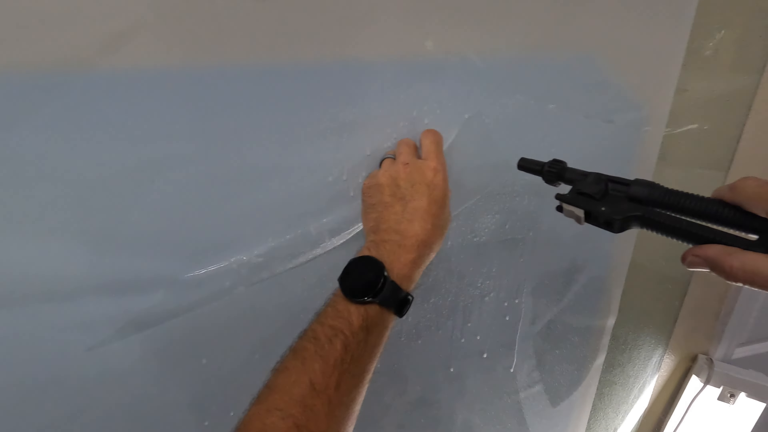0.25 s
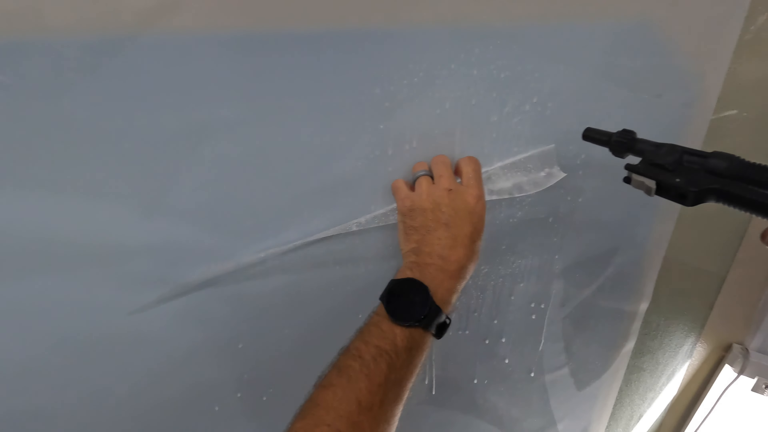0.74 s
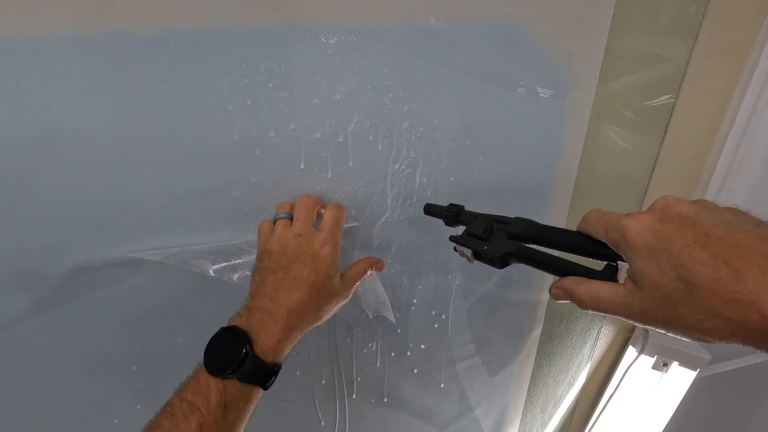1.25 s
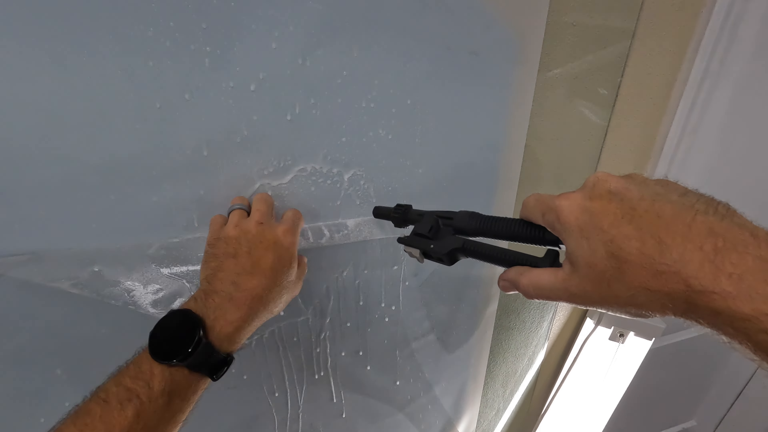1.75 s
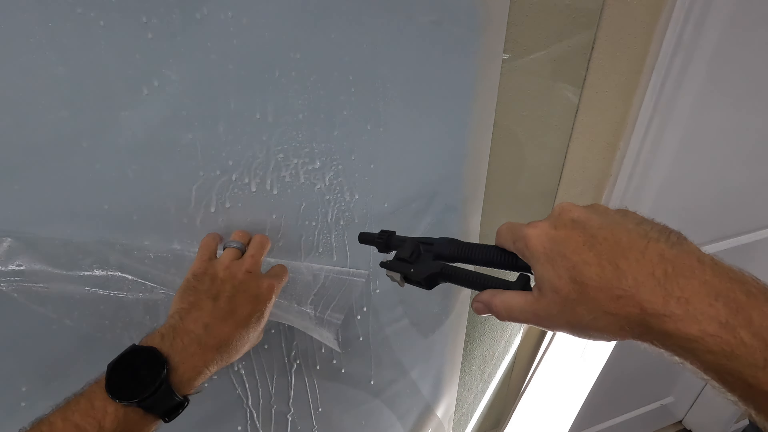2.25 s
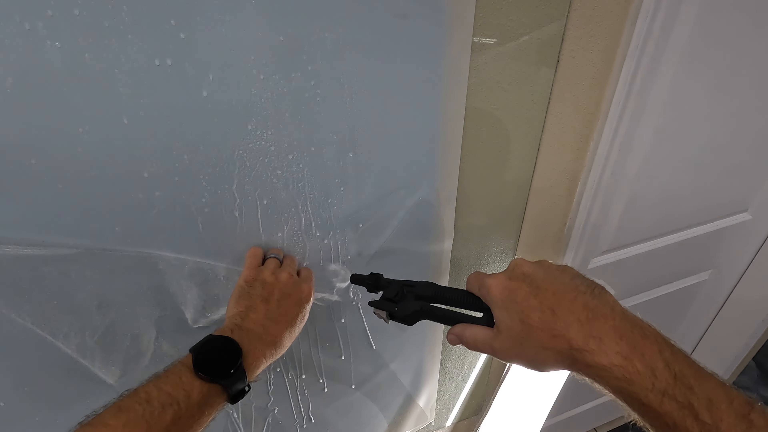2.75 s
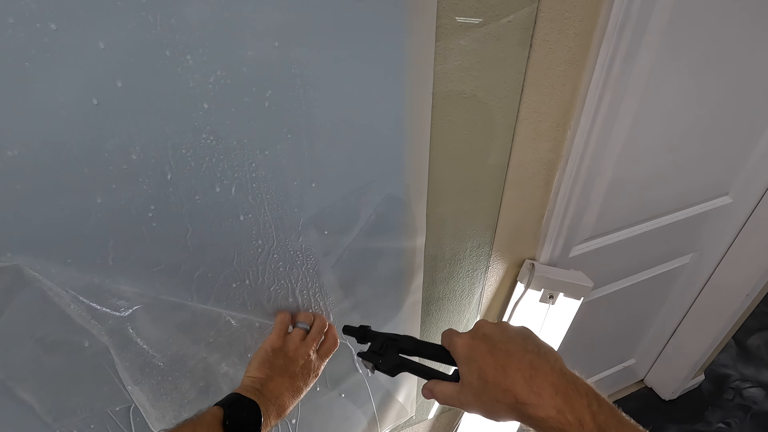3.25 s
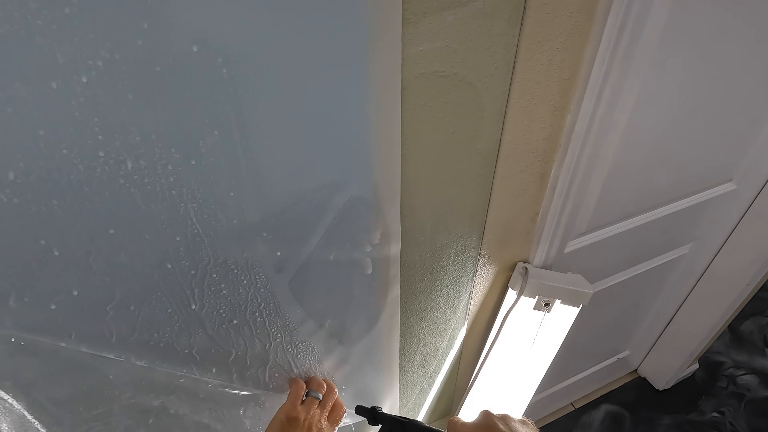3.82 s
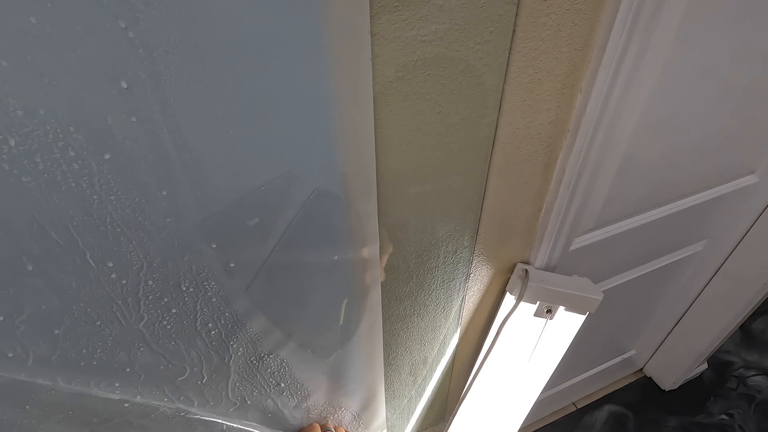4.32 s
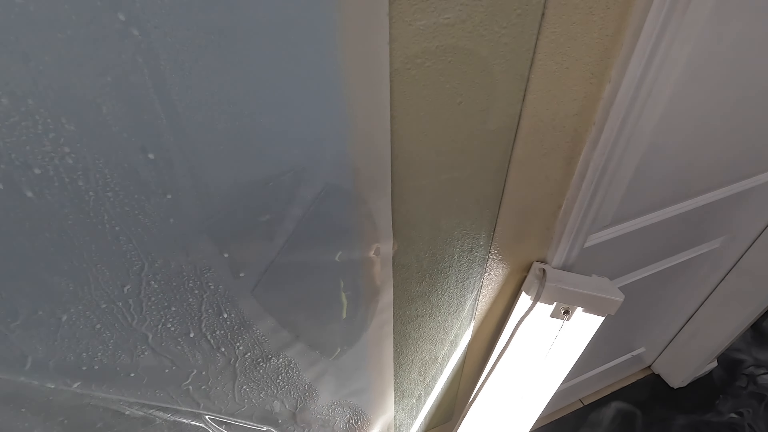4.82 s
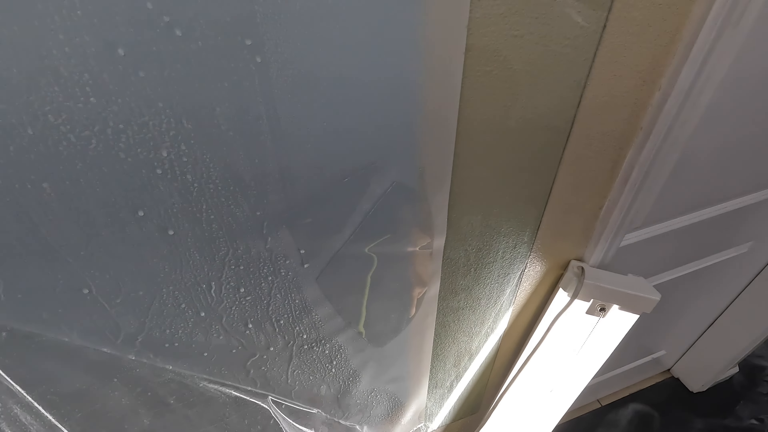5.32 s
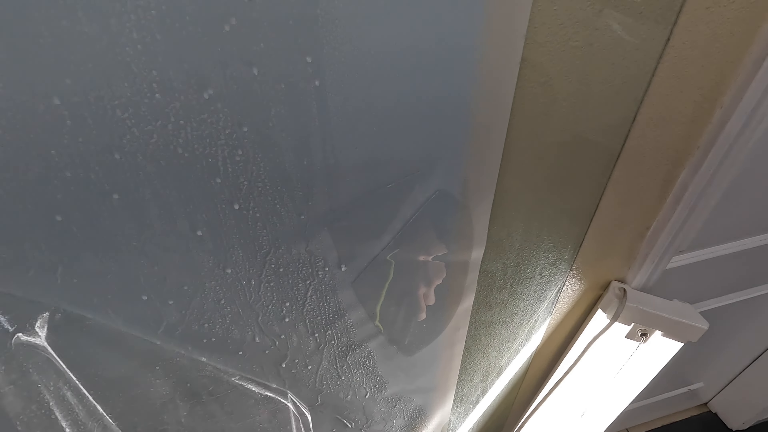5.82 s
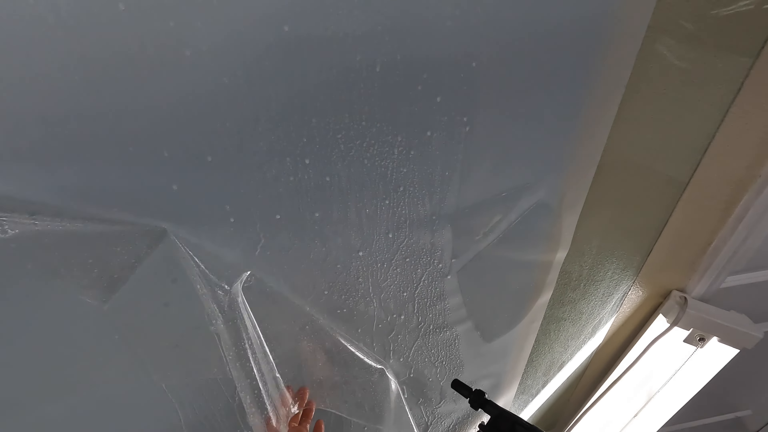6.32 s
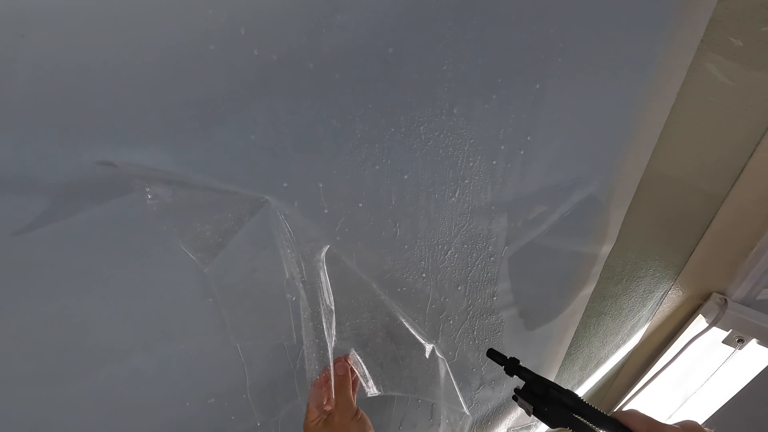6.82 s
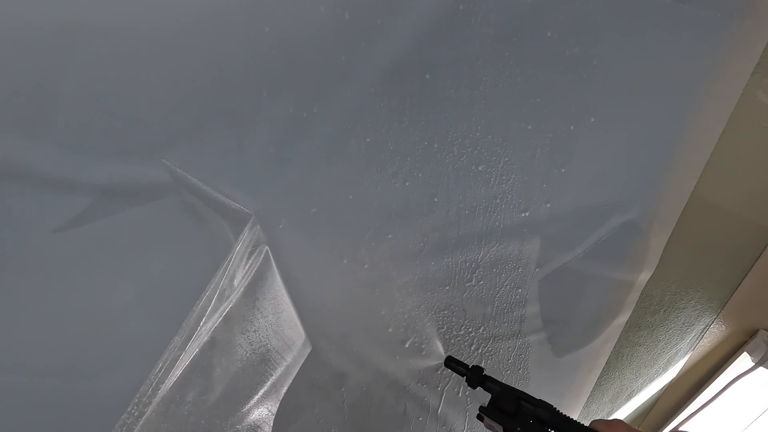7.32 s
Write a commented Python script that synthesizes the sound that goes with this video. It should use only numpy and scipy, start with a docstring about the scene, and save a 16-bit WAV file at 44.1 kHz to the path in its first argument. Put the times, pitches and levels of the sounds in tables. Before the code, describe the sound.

Short wet hisses from a trigger sprayer under thin plastic film, with crinkles, sharp film snaps, a longer final spray and low ventilation rumble.

```python
"""Ventilation rumbles throughout: a resonant deep hum of noise and banded noise for the rush of air. A trigger
sprayer is already squirting under a clear plastic film on a large pane: gated clouds of clicks. From 0.2 s on,
between and over squirts, the film rustles (clumped clicks) and snaps (ringing pops, cracks); brief dull low
knocks sound (decaying sines). Fine foam ticks gather around 5 s, then wet film swishes off the glass into the
last, longest squirt at 7 s. A hard-walled workshop rings on: decaying noise, band by band."""
import sys
import numpy as np
from scipy import signal
from scipy.io import wavfile

SR = 44100
rng = np.random.default_rng(int(sys.argv[2]) if len(sys.argv) > 2 else 0)


def put_to_file(sound):
    """Save the sound as 16-bit audio at rate SR, in the file named by the first command-line argument."""
    columns = np.atleast_2d(sound).T  # one column per channel
    safe = np.clip(columns, -1, 1)
    whole_steps = np.round(safe * 32767)
    wavfile.write(sys.argv[1], SR, whole_steps.astype(np.int16))


N = 333396
TIME = np.arange(N) / SR


def from_db(db):
    """Gain of a level in dB."""
    return 10 ** (np.asarray(db) / 20)


def rms_one(x):
    """Scale to rms 1."""
    return x / np.sqrt(np.mean(x ** 2) + 1e-20)


def in_time(rows):
    """Draw breakpoint columns as curves, one value per sample; the first column is t/s."""
    s, *columns = np.transpose(rows)
    return np.array([np.interp(TIME, s, column) for column in columns])


def at_hz(points, hz):
    """Read a (f/Hz, value) curve on a log frequency axis."""
    f, values = np.array(points).T
    return np.interp(np.log(hz), np.log(f), values)


def drift(rate):
    """Random wander: 'rate' noise knots a second, of spread 1, joined by lines."""
    knots = rng.standard_normal(int(N / SR * 400))
    return np.interp(TIME * rate, np.arange(len(knots)), knots)


def bands(white, low_hz, per_octave):
    """Split noise into (centre f/Hz, band) pairs; neighbouring bands use unrelated draws."""
    edges = low_hz * 2 ** np.arange(0, np.log2(17000 / low_hz), 1 / per_octave)
    for k, (low, high) in enumerate(zip(edges, edges[1:])):
        band_pass = signal.butter(2, [low, high], "band", fs=SR, output="sos")
        yield np.sqrt(low * high), signal.sosfilt(band_pass, white[k % 2])


def spread(mid, side, alike, balance_db=0):
    """Mix a stereo pair with a given left-right likeness (0 to 1) and balance."""
    alike = np.clip(alike, 0, 1)
    sign = np.array([[1], [-1]])
    stereo = np.sqrt(1 + alike) * mid + np.sqrt(1 - alike) * side * sign
    return stereo * from_db(sign * balance_db / 2)


def grains(per_s, uneven_db):
    """Random clicks of uneven size and either sign, scaled to rms 1."""
    size_db = uneven_db * np.minimum(rng.exponential(1, (2, 2, N)), 4)
    sizes = from_db(size_db) * rng.choice([-1, 1], (2, 2, N))
    return rms_one(sizes * (rng.random((2, 2, N)) < per_s / SR))


def ring(x, hz, t60):
    """Two-pole resonator: a unit click sets off a sine that starts at height 1 and dies by 60 dB in t60."""
    r, w = from_db(-60 / (t60 * SR)), 2 * np.pi * hz / SR
    return signal.lfilter([0, np.sin(w)], [1, -2 * r * np.cos(w), r * r], x)


# ventilation: (t/s, deep hum level/dB before its wavering, air rush level/dB)
RUMBLE = [(0.0, -37, -43.5), (0.9, -34.5, -41.5), (1.9, -33.5, -43.5), (2.5, -41, -44.5),
          (3.7, -36.5, -41.5), (4.5, -44.5, -42.5), (5.3, -34.5, -47), (6.2, -37.5, -46),
          (7.56, -40, -44.5)]
# colour of the air rush: (f/Hz, relative level/dB per Hz)
AIR_COLOUR = [(15, -3), (23, 1.5), (32, -8.5), (62, -8.5), (75, -6), (120, -10), (250, -21.5), (543, -36),
              (588, -29), (790, -37.5), (1390, -34), (3350, -56.5), (10900, -55.5), (15000, -75)]
# stereo width of the air rush: (f/Hz, left-right likeness 0 to 1)
AIR_LIKENESS = [(25, .93), (60, 0.975), (300, 0.96), (1000, .7), (8000, .6)]


def rumble():
    """Ventilation: noise through a deep duct resonance, and a broad rush of air."""
    hum_hz, resonator_width_hz, hum_wavers_db = 45, 15, 2.5
    hum_db, air_db = in_time(RUMBLE)
    t60 = np.log(1000) / np.pi / resonator_width_hz
    hum = ring(rng.standard_normal(N + SR), hum_hz, t60)
    hum = ring(hum, hum_hz, t60)      # the second pass steepens the skirts
    low_cut = signal.butter(4, .75 * hum_hz, "high", fs=SR, output="sos")
    hum = signal.sosfilt(low_cut, hum)[SR:]      # skip the build-up
    air = 0
    for hz, (mid, side) in bands(rng.standard_normal((2, 2, N)), 15.98, 3):
        gain = from_db(at_hz(AIR_COLOUR, hz) + 1.6 * drift(9))
        air = air + gain * spread(mid, side, at_hz(AIR_LIKENESS, hz))
    return from_db(hum_db + hum_wavers_db * drift(6)) * rms_one(hum) + from_db(air_db) * rms_one(air)


# squirts: (valve opens t/s, shuts t/s, jet level/dB, swell over the squirt/dB, treble-over-bass gain over it/dB,
# aim from loose film 0 to bare glass 1, mist above 6 kHz/dB, level around 2 kHz/dB,
# resonance of the air pocket under the film f/Hz, its level/dB against the jet, added left-right balance/dB)
SQUIRTS = [(-0.1, 0.073, -24, 3, -7, .1, 0, 1, 2070, 9.5, 0.5),
           (0.418, 0.612, -25, 1, 1.1, 0.43, -2, -1, 1170, -0.5, -3),
           (0.954, 1.142, -22.5, 0, 3, .05, 0.2, -5.5, 1060, -5, -0.5),
           (1.639, 1.802, -22.5, 1.5, -5, 0.027, 1, 1, 2250, 1, 0.8),
           (2.109, 2.267, -22, -1.6, -1.5, 0.093, 1.5, -1.5, 3500, -16, 1.5),
           (2.877, 3.119, -27, 3.5, 2.1, 0.57, 3.5, 0.5, 1320, -1, 1.1),
           (3.474, 3.683, -26, 3.5, 3, 0.59, 2, 0.5, 1610, -1, 0.8),
           (4.084, 4.273, -25, 4.5, 5, 0.53, -.6, 2.5, 2130, 1.5, 0.8),
           (5.28, 5.445, -26, 3, 0.5, 0.52, 1, 2, 5790, -15, 0.3),
           (5.871, 6.065, -32.5, 3, -5.5, 1, 3.5, -2, 5730, -5, 1),
           (7.035, 7.695, -27.5, -1, -4, 0.76, 0.1, 1, 950, -10, -0.2)]
# colour of the jet: (f/Hz, relative level/dB per Hz)
SPRAY_COLOUR = [(200, -12), (600, -7.5), (1050, -0.5), (1900, -6.5), (3400, -2.5), (4100, -4.5), (5300, -2),
                (7200, -5), (8200, -11.5), (9700, -20.5), (11000, -9), (13000, -21.5), (15600, -23)]
# change from loose film to bare glass: (f/Hz, level/dB)
AIM_COLOUR = [(500, 8), (1100, 2), (2000, 7), (3500, -5.5), (6000, -1.5), (11500, 8.5)]
# stereo width of the jet: (f/Hz, left-right likeness 0 to 1)
SPRAY_LIKENESS = [(300, 0.96), (1200, 0.97), (3000, 0.78), (7000, 0.89), (12000, 0.76)]
# stereo balance of the jet: (f/Hz, left-right level/dB)
SPRAY_BALANCE = [(300, -0.5), (1000, -1), (3500, -1.5), (7500, 1), (9500, 2), (14000, 0.5)]


def spray():
    """Thousands of droplets a second; each squirt has its own aim and air pocket, and an echo off the pane."""
    pane_echo_s, pane_echo_share = .0006, 0.067
    pocket_sharpness = 10.5      # resonance f over its width
    rows, valve = [], np.zeros((len(SQUIRTS), N))
    for k, squirt in enumerate(SQUIRTS):
        opens, shuts, level_db, swell_db, brighter_db, aim, mist_db, middle_db, _, _, pan_db = squirt
        for place, s in ((-.5, opens), (.5, shuts)):
            level_there, tilt_there = level_db + place * swell_db, place * brighter_db
            rows.append((s, level_there, tilt_there, pan_db, aim - .5, mist_db, middle_db))
        # snaps open with a surge of pressure, dribbles shut
        since = np.clip(TIME - opens, 0, None)
        valve[k] = np.clip(since / 0.002, 0, 1) * (1 + 0.31 * np.exp(-since / 0.0046))
        # a faint hiss swells briefly just before each squirt
        valve[k] += 0.33 * np.exp(np.clip(TIME - opens, None, 0) / 0.0048) * (since < .003)
        valve[k] *= np.exp(-np.clip(TIME - shuts, 0, None) / 0.0071)
    level_db, tilt_db, pan_db, aim, mist_db, middle_db = in_time(rows)
    jet, sputter = 0, drift(60)      # the sputter is shared by all bands
    for hz, (mid, side) in bands(grains(14000, uneven_db=1.0), 178.5, 4):
        colour_db = at_hz(SPRAY_COLOUR, hz) + aim * at_hz(AIM_COLOUR, hz)
        colour_db = colour_db + tilt_db * np.clip(np.log2(hz / 2200), -1, 1) / 2
        colour_db += mist_db * np.clip(np.log2(hz / 6000), 0, 1)
        colour_db += middle_db * np.clip(1 - abs(np.log2(hz / 2000)) / 0.78, 0, 1)
        flicker_db = .6 * sputter + 1.5 * drift(30) + .7 * drift(9)
        balance_db = at_hz(SPRAY_BALANCE, hz) + pan_db
        droplets = spread(mid, side, at_hz(SPRAY_LIKENESS, hz), balance_db)
        jet = jet + from_db(colour_db + flicker_db) * droplets
    jet = from_db(level_db) * rms_one(jet)
    jet = jet + pane_echo_share * np.roll(jet, round(pane_echo_s * SR), axis=1)
    out = 0
    for gate, (*_, pocket_hz, pocket_db, _) in zip(valve, SQUIRTS):
        pocket = signal.lfilter(*signal.iirpeak(pocket_hz, pocket_sharpness, fs=SR), jet)
        out = out + gate * (jet + from_db(pocket_db) * pocket)
    return out


# reverberation of the workshop: (f/Hz, time to die by 60 dB t/s)
ROOM_DECAY = [(300, 0.59), (1000, 0.73), (3500, 0.95), (8000, 0.75), (14000, .5)]


def workshop(x):
    """Dense reflections: noise that dies band by band, starting after the first wall."""
    room_db, likeness = -18.5, 0.62
    length = SR
    t = np.arange(length) / SR
    echo = 0
    for hz, (mid, side) in bands(rng.standard_normal((2, 2, length)), 136.6, 0.906):
        echo = echo + from_db(-60 * t / at_hz(ROOM_DECAY, hz)) * spread(mid, side, likeness)
    echo = echo * np.clip((t - .004) / 0.0097, 0, 1)
    echo = echo / np.sqrt(np.sum(echo ** 2) / 2)      # unit energy per side
    return from_db(room_db) * signal.fftconvolve(echo, x[None], axes=1)[:, :N]


# the hand pulls the film: (loudest t/s, fade scale t/s, low crinkle level/dB, high crinkle level/dB)
RUSTLE = [(0.283, 0.06, -60, -54), (0.386, 0.12, -41, -41), (0.91, 0.11, -51.5, -59),
          (1.575, 0.05, -72, -58), (1.61, 0.02, -45, -44), (2.025, 0.21, -54.5, -72),
          (2.49, 0.05, -62, -55), (2.6, 0.05, -68, -60), (2.713, 0.034, -50, -54), (2.76, 0.08, -50, -58),
          (2.846, 0.058, -46, -49.5), (3.277, 0.025, -73, -50), (3.395, 0.097, -49, -53.5),
          (3.82, 0.045, -52, -47), (3.928, 0.041, -79.5, -55), (4.048, 0.14, -58, -57),
          (4.396, 0.15, -45, -55), (4.482, 0.021, -34, -35), (4.534, 0.028, -35.5, -34.5),
          (4.592, 0.12, -48.5, -45.5), (4.727, 0.02, -46, -41), (4.837, 0.053, -61, -40.5),
          (5.191, 0.091, -80, -64), (5.754, 0.065, -68, -54), (6.411, 0.088, -56, -69),
          (6.875, 0.051, -47, -75), (7.011, 0.033, -49, -64)]
# colour of the low crinkle: (f/Hz, relative level/dB per Hz)
RUSTLE_LOW = [(250, -9), (600, -6), (1200, 0), (2200, -5), (3500, -22), (15000, -70)]
# colour of the high crinkle: (f/Hz, relative level/dB per Hz)
RUSTLE_HIGH = [(300, -47.5), (2000, -1.5), (4500, 7), (7500, 3), (10000, -10.5), (13000, -14),
               (15500, -39.5)]


def rustle():
    """Clumped crinkles of the film; each pull or settling crease starts abruptly and fades."""
    settle_s, settle_db = .02, -26      # every snap trails a short crinkle, relative to its level
    low_gain, high_gain = np.zeros((2, N))
    settling = []
    for s, snap_db, _, crack_db in SNAPS:
        trail_db = snap_db + settle_db
        settling.append((s, settle_s, trail_db, trail_db + crack_db))
    for s, length, low_db, high_db in RUSTLE + settling:
        near = slice(int((s - length) * SR), int((s + 3 * length) * SR))
        late = (TIME[near] - s) / length
        swell = np.exp(-np.where(late < 0, 30, 3) * late ** 2)
        low_gain[near] += from_db(low_db) * swell
        high_gain[near] += from_db(high_db) * swell
    low = high = 0
    for hz, (mid, side) in bands(grains(4000, uneven_db=4.5), 243, 2.006):
        band = spread(mid, side, 0.84)
        low = low + from_db(at_hz(RUSTLE_LOW, hz)) * band
        high = high + from_db(at_hz(RUSTLE_HIGH, hz)) * band
    flutter = from_db(1.6 * drift(80))
    return flutter * (low_gain * rms_one(low) + high_gain * rms_one(high))


# film snapping: (t/s, level/dB, pop f/Hz, share of treble crack level/dB)
SNAPS = [(0.3526, -38, 2400, -6), (0.3794, -27, 2500, -8), (0.5007, -13, 1140, -7),
         (0.8561, -37, 1120, -15), (0.871, -37, 1500, -18), (1.272, -40, 3600, -6),
         (0.9394, -20.5, 3230, -11), (1.4277, -42, 1210, -4), (1.6093, -31, 1440, -11),
         (2.0331, -32, 1490, -18), (2.7291, -22, 1380, -19), (2.763, -28, 1250, -14),
         (2.7976, -24, 1180, -16), (2.8143, -18, 1210, -4), (2.8335, -18, 1120, -4),
         (3.3942, -28, 1830, -14), (3.436, -26, 1770, -11), (3.6312, -13, 1870, -7),
         (3.7987, -35, 1080, -11), (3.8173, -28, 3270, -5), (3.8683, -37, 1510, -15),
         (3.9157, -30, 3530, -1.5), (3.9302, -35, 840, -3), (4.037, -36, 1720, -6), (4.0547, -31, 970, -15),
         (4.3576, -11, 2050, -22), (4.3977, -17, 2240, -21), (4.4331, -17, 1890, -12),
         (4.4637, -16, 1940, -13), (4.4778, -15, 1830, -16), (4.5059, -17, 1890, -7),
         (4.5288, -15, 2090, -11), (4.7198, -19.5, 1850, -7), (4.9216, -36, 3700, -1.5),
         (5.2198, -32, 1400, -.3), (6.3397, -41, 1060, -13), (6.4095, -35, 1010, -15),
         (6.4173, -33, 2000, -19), (6.6834, -46, 3700, -.3), (6.88, -38, 1400, -12), (6.986, -36, 2630, -9)]


def snaps():
    """A crease flips: a pop of a few cycles, a treble crack and a short rasp as the film settles."""
    flap_hz, flap_db, flap_s = 280.4, -20.5, 0.01      # the whole sheet flaps once at each snap
    rasp_db = -18.5      # noise against the flip that sets off the pop
    out, length = np.zeros(N + SR), SR // 16
    t = np.arange(length) / SR
    noise = rng.standard_normal((len(SNAPS), length))
    treble = signal.butter(2, [2600, 9500], "band", fs=SR, output="sos")
    thin = signal.butter(2, 300, "high", fs=SR, output="sos")      # a light film moves no bass
    flap = np.sin(2 * np.pi * flap_hz * t) * np.exp(-t / flap_s) * (1 - np.exp(-t / .002))
    for (s, level_db, hz, crack_db), hiss in zip(SNAPS, noise):
        flip = np.sin(2 * np.pi * hz * t) * (t < 1 / hz)      # one swing of the crease
        rasp = from_db(rasp_db) * hiss * np.exp(-t / 0.0056)
        push = flip + rasp
        pop = ring(push, hz, 11.5 / hz) + 1.2 * ring(push, 1.3 * hz, 5.0 / hz)
        pop = signal.sosfilt(thin, pop)
        crack = signal.sosfilt(treble, .6 * rasp + hiss * np.exp(-t / .0015))
        share = min(from_db(crack_db), .98)
        sound = np.sqrt(1 - share ** 2) * pop / abs(pop).max() + share * crack / abs(crack).max()
        sound += from_db(flap_db) * flap
        out[round(s * SR):][:length] += from_db(level_db) * sound
    return out[:N]


# brief dull low knocks: (t/s, level/dB before the envelope, f/Hz)
LOW_KNOCKS = [(0.398, -30, 61), (3.658, -23, 80), (3.821, -36.5, 403), (4.15, -32.5, 280),
              (4.53, -26, 61.9), (6.987, -28, 61.5)]


def low_knocks():
    """Brief dull low knocks: sines with a soft attack and a quick decay."""
    out = np.zeros(N)
    for s, level_db, hz in LOW_KNOCKS:
        t = np.clip(TIME - s, 0, None)
        envelope = (1 - np.exp(-t / 0.0022)) * np.exp(-t / 0.015)
        out += from_db(level_db) * np.sin(2 * np.pi * hz * t) * envelope
    return out


# foam gathers: (t/s, level/dB)
DROPS = [(4.5, -81), (5.2, -69.5), (7.56, -81.5)]


def drops():
    """Tiny foam bubbles burst on the wet film: faint lone ticks in the treble."""
    ticks = grains(per_s=25, uneven_db=4.5)[0, 0]
    treble = signal.butter(2, [6000, 13000], "band", fs=SR, output="sos")
    return from_db(in_time(DROPS)[0]) * rms_one(signal.sosfilt(treble, ticks))


# wet film sliding off the glass before the long spray: (t/s, level/dB)
SLIDE = [(6.6, -81.5), (6.8, -56.5), (7.03, -53), (7.1, -80)]
# colour of the slide: (f/Hz, relative level/dB per Hz)
SLIDE_COLOUR = [(400, -16.5), (1300, -1.5), (2500, -4), (3600, -9.5), (5200, -4.5), (6300, -30),
                (12000, -43)]


def slide():
    """Wet film slides off the glass: banded noise makes a smooth, airy swish."""
    swish = 0
    for hz, (mid, side) in bands(rng.standard_normal((2, 2, N)), 407, 3):
        swish = swish + from_db(at_hz(SLIDE_COLOUR, hz)) * spread(mid, side, 0.9)
    return from_db(in_time(SLIDE)[0]) * rms_one(swish)


def scene():
    """Sprayer and film close by, their echo, the brief low knocks and the rumble."""
    near = spray() + rustle() + slide() + snaps() + drops()
    return near + workshop(near.mean(axis=0)) + low_knocks() + rumble()


def record(dry):
    """The small microphone loses the deepest bass and rolls off in the top octave; above that a steep cut."""
    roll_off_hz, low_cut_hz, cutoff_hz = 13200, 18.6, 15750
    rolled = signal.sosfilt(signal.butter(6, roll_off_hz, fs=SR, output="sos"), dry)
    rolled = signal.sosfilt(signal.butter(2, low_cut_hz, "high", fs=SR, output="sos"), rolled)
    return signal.sosfilt(signal.cheby2(16, 60, cutoff_hz, fs=SR, output="sos"), rolled)


dry = scene()
out = record(dry)
put_to_file(out)
```